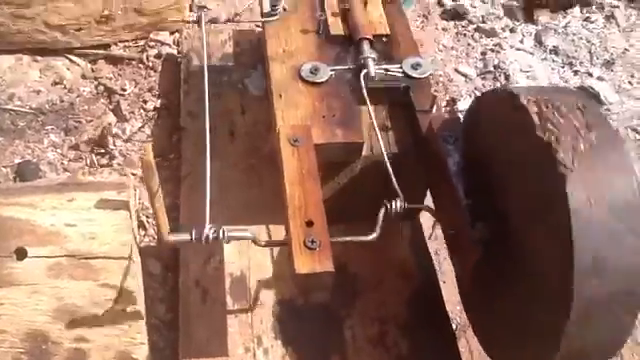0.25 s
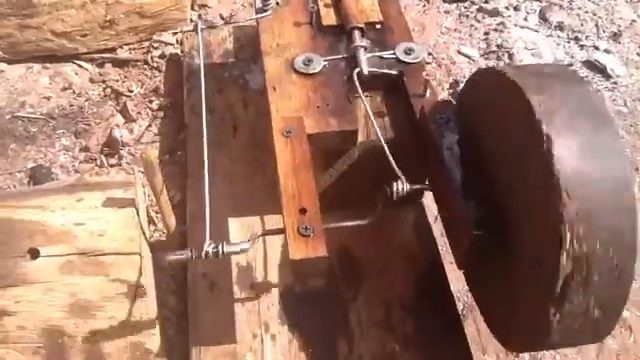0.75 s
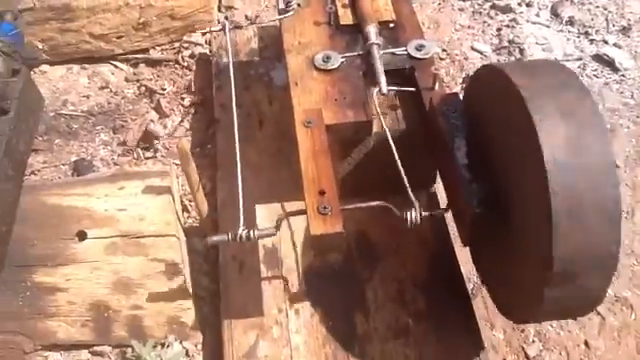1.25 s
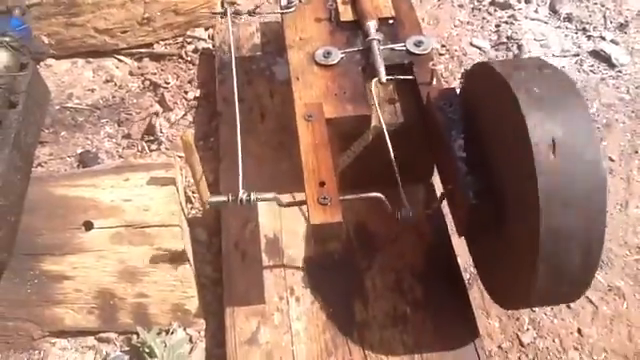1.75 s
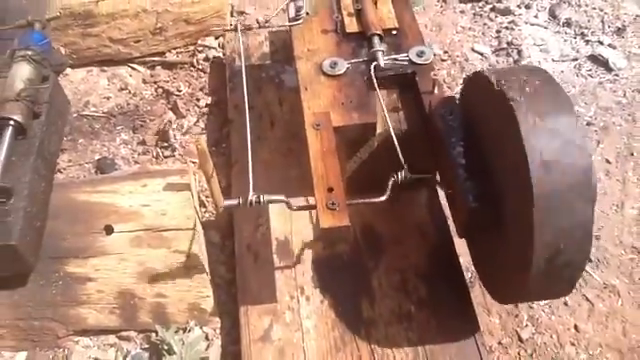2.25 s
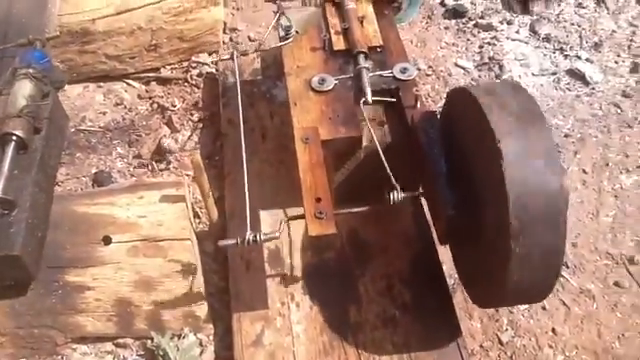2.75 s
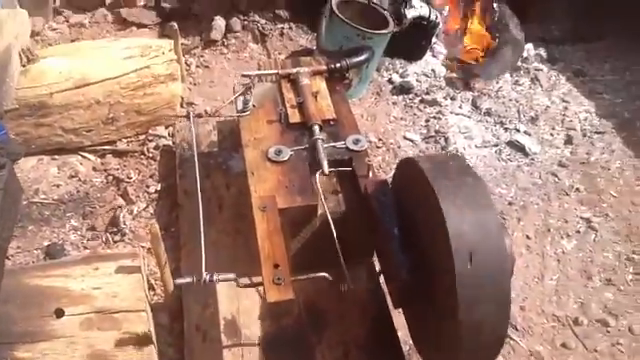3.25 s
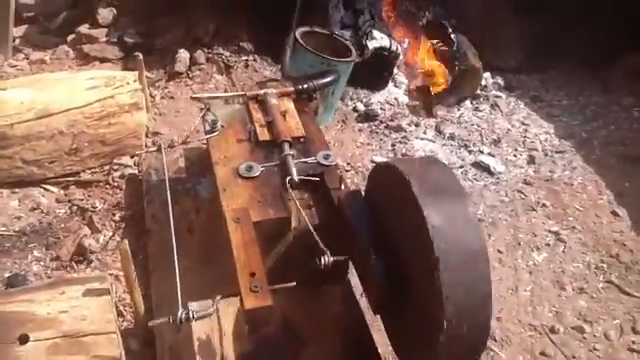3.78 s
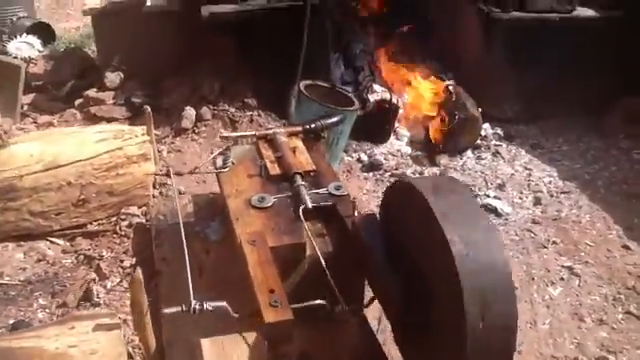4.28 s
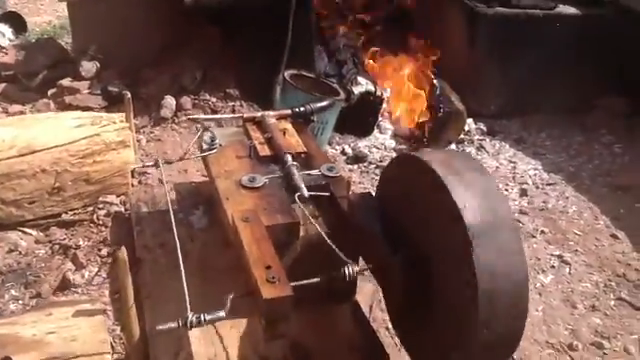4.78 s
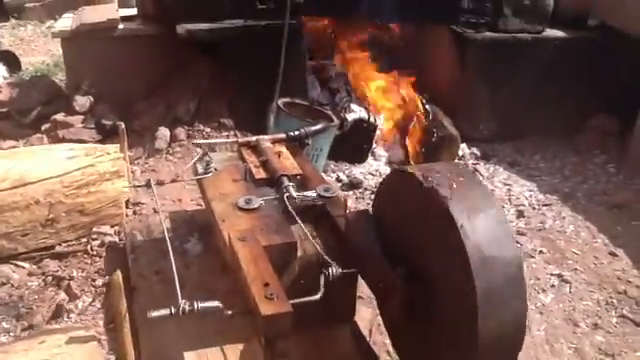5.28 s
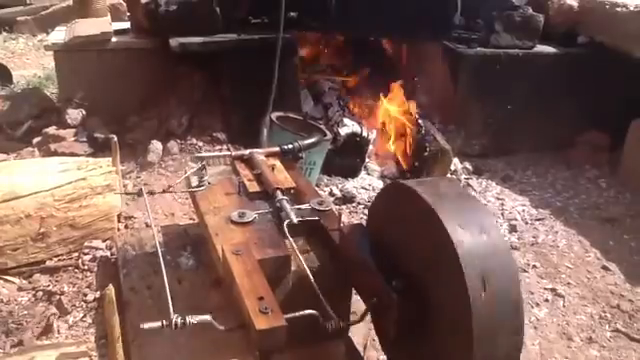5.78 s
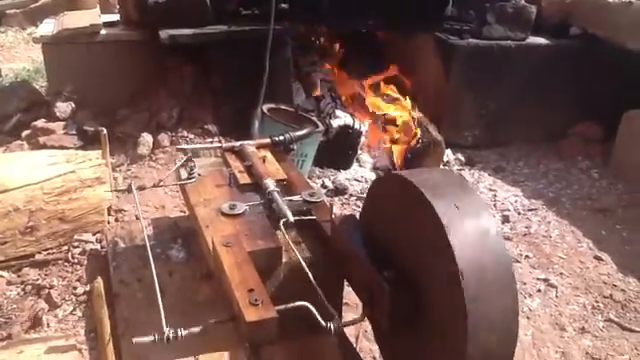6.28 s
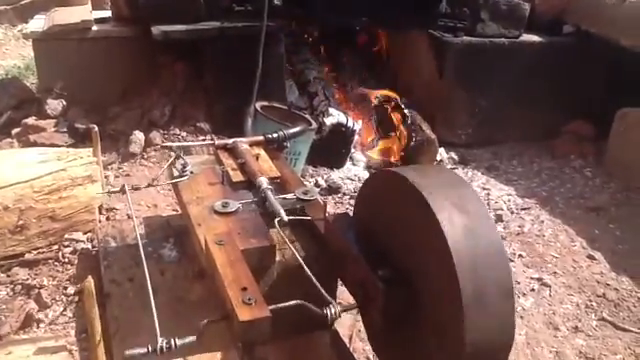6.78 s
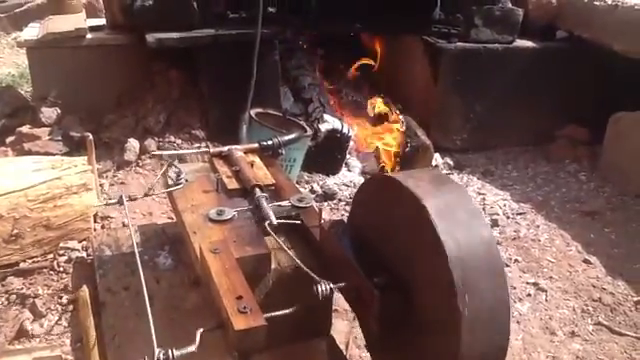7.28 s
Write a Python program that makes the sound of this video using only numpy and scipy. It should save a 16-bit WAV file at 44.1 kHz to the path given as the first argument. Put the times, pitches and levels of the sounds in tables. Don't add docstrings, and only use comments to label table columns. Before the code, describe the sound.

Loud, wet, airy steam pulses dominate from start to finish, rushing in and puffing out with each flywheel turn, faster and faster. Small wooden knocks and metallic clicks sit faintly beneath, alongside a lumpy low flame roar. Wood pops sparsely around the middle, loudest near five seconds, and a strong fire gulp comes near seven. Close microphone, dry open air, tone shifting subtly as the camera moves away.

```python
import sys
import numpy as np
from scipy import signal
from scipy.fft import rfft, irfft, next_fast_len
from scipy.io import wavfile
from scipy.ndimage import uniform_filter1d, map_coordinates

SR = 44100
rng = np.random.default_rng(int(sys.argv[2]) if len(sys.argv) > 2 else 0)


def int16_out(signal):
    q = np.round(np.clip(np.atleast_2d(signal).T, -1, 1) * 32767)
    wavfile.write(sys.argv[1], SR, q.astype(np.int16))


def convert_level_to_amplitude(level_db):
    exponent = np.asarray(level_db, float) / 20
    return 10 ** exponent


N = 332514
T = np.arange(N) / SR

# start in seconds, then blow-down, sweep and valve puff levels in dB.
FLYWHEEL_TURNS = [(-0.017, 2.5, 1.5, 0.5), (0.41, 0, 4.5, -1.5), (0.829, 1.2, 6, 0.5),
                  (1.237, 0.5, 4.5, -0.5), (1.64, 1.7, 3, -0.5), (2.034, 0.5, 4, 0.2),
                  (2.416, -2.5, 2.7, -1), (2.788, 0, 3.5, 0.7), (3.154, -0.6, 2.5, 0),
                  (3.504, 0.1, 1.5, -1.5), (3.846, 1.5, 2, 0.5), (4.178, -3.5, 2.5, 0.2),
                  (4.502, -1, 1.5, 0.2), (4.815, 0.7, 2, -0.5), (5.12, -0.5, 1, 0.3),
                  (5.417, -2, 0.5, -4.5), (5.705, -4, 1.5, 0.4), (5.991, -0.2, 2, 0.4),
                  (6.266, -3, -2, 0.5), (6.536, -2, 0, -1), (6.797, -2.5, -0.5, -1.5),
                  (7.055, -2.5, 0.5, -0.5), (7.304, -0.5, 1.8, -5), (7.547, -2, -6, -6)]
# frequency in Hz, level in dB.
NOZZLE_COLOUR = [(800, -35), (2000, -2.5), (3500, -0.5), (6000, 2), (8000, 4), (11000, 0.5), (13500, 1),
                 (15500, 0)]
# crank angle 0-1, lower edge of the jet in Hz,
# hump of the jet in Hz.
VALVE_PORT = [(0, 6500, 8300), (.06, 5540, 7600), (.13, 4140, 6550), (.195, 3780, 6880), (.235, 5400, 7000),
              (.75, 5340, 7300), (.82, 4100, 6600), (.89, 4400, 4900), (1, 6500, 8300)]
# time in seconds, turned away 0-1, notch in Hz, level in dB,
# gravel echo in ms.
CAMERA_SWING = [(0, 0, 8800, -0.9, 1.76), (.7, 0, 8800, 0.3, 1.92), (2.3, 0.05, 9100, -0.55, 1.64),
                (3.3, 0.08, 9370, 0.6, 1.72), (3.9, 0.4, 10700, -0.3, 1.65), (4.35, 0.6, 11600, 1.3, 1.53),
                (4.7, 0.3, 13300, 0.2, 1.54), (5.1, 0.8, 10800, 2.1, 1.51), (5.6, 0.88, 11200, 0, 1.54),
                (6.5, .9, 11200, 1, 1.45), (7.54, .95, 11000, 0.46, 1.58)]


def unit(x):
    return x / np.sqrt(np.mean(x ** 2) + 1e-20)


def between(ends, share):
    return ends[0] + share * (ends[1] - ends[0])


def bump(x, at, width):
    return np.exp(-((x - at) / width) ** 2 / 2)


def along(points, hz):
    f, db = np.transpose(points)
    return convert_level_to_amplitude(np.interp(np.log(hz + 1), np.log(f + 1), db))


def columns(rows, at):
    key, *cols = np.transpose(rows)
    return [np.interp(at, key, c) for c in cols]


def wobble(rate):
    return map_coordinates(rng.standard_normal(int(N * rate / SR) + 4), [T * rate])


def shaped(x, gain, size=256):
    hz, s, z = signal.stft(x, SR, nperseg=size, noverlap=size * 3 // 4)
    return signal.istft(z * gain(hz[:, None], s), SR, nperseg=size, noverlap=size * 3 // 4)[1][:N]


def filtered(x, response):
    m = next_fast_len(N + SR // 2)
    return irfft(rfft(x, m) * response(np.fft.rfftfreq(m, 1 / SR)), m)[:N]


def peak(hz, centre_hz, width_hz):
    return 1 / np.sqrt(1 + (2 * (hz - centre_hz) / width_hz) ** 2)


def crank(s):
    rows = np.array(FLYWHEEL_TURNS)
    turns = np.interp(s, rows[:, 0], np.arange(len(rows)))
    return turns % 1, rows[turns.astype(int)].T


def each_turn(angle):
    starts = np.array(FLYWHEEL_TURNS)[:, 0]
    return np.clip((starts[:-1] + angle * np.diff(starts)) * SR, 0, N - 1).astype(int)


def wet_steam(patchy_db, spit_db):
    def patches(hz, s):
        field = rng.standard_normal((len(hz), len(s)))
        field = uniform_filter1d(uniform_filter1d(field, size=4, axis=0), size=14, axis=1)
        return convert_level_to_amplitude(patchy_db * unit(field))
    flutter = convert_level_to_amplitude(spit_db * (wobble(60) + wobble(500)))
    return unit(shaped(rng.standard_normal(N), patches) * flutter)


def admission():
    def pressure(angle):
        return np.cos(2 * np.pi * (angle - 0.95))

    def build(angle):
        around = (angle + .5) % 1 - .5
        cutoff_angle = .2
        swell = (around < cutoff_angle) * bump(around, cutoff_angle, 0.053)
        return swell - 0.39 * bump(around, 0, 0.04)

    def port(hz, s):
        angle = crank(s)[0]
        edge_hz, hump_hz = columns(VALVE_PORT, angle)
        hump_db = -1 + 4 * pressure(angle) + 4.5 * build(angle)
        treble_db = -1.6 + 3 * pressure(angle)
        skirt = convert_level_to_amplitude(-18.5) + 1 / np.sqrt(1 + (edge_hz / (hz + 1)) ** 8)
        hump = hump_db * np.exp(-np.log((hz + 1) / hump_hz) ** 2 / 0.032)
        treble = treble_db / (1 + (10500 / (hz + 1)) ** 12)
        return along(NOZZLE_COLOUR, hz) * skirt * convert_level_to_amplitude(hump + treble)

    angle = crank(T)[0]
    boiler_db = 1.82 - 0.3734 * T
    level_db = -15 + 1.07 * pressure(angle) + 2.5 * build(angle) + boiler_db
    return convert_level_to_amplitude(level_db) * unit(shaped(wet_steam(1.0, 0.48), port))


def exhaust():
    # crank angle 0-1, level in dB.
    flow = [(.235, -21), (.27, -19), (.3, -13), (.34, -14.5), (.36, -18), (.47, -21.5), (.58, -20.5),
            (.69, -12), (.765, -19.5)]
    # rest in Hz, angle 0-1 where the climb starts,
    # climb in Hz per turn, level early in dB, level late in dB.
    glides = [(3445, 0.43, 10100, -8, 4.5), (5750, .47, 12600, -2, 1.5), (7300, 0.35, 14500, 2.5, -4.5)]
    # width in Hz, level in dB.
    bore_modes = [(420, 0), (520, 1), (850, 1), (1100, -3), (1300, -2), (1500, -10)]
    soft_turns = 0.035
    opens, shuts = flow[0][0], flow[-1][0]

    def cylinder(hz, s):
        angle = np.clip(crank(s)[0], opens, shuts)
        stroke = (angle - opens) / (shuts - opens)
        centres = [rest + climb * soft_turns * np.logaddexp(0, (angle - at) / soft_turns)
                   for rest, at, climb, *_ in glides]
        step_hz = between((2450, 3420), stroke)
        centres += [centres[-1] + k * step_hz for k in (1, 2, 3)]
        upper_db = between((2.5, -4.5), stroke) + 0.9 * np.clip(columns(flow, angle)[0] + 15, -8, 0)
        strengths = [between(row[3:], stroke) for row in glides] + 3 * [upper_db]

        def unsteady():
            return np.interp(s, T, wobble(14))
        centres = [c * (1 + 0.02 * unsteady()) for c in centres]
        strengths = [more + 1.54 * unsteady() for more in strengths]
        power = sum((convert_level_to_amplitude(db + more) * peak(hz, c, w) ** 1.27) ** 2
                    for c, more, (w, db) in zip(centres, strengths, bore_modes))
        gain = np.sqrt(power + convert_level_to_amplitude(-38.5) * along(NOZZLE_COLOUR, hz))
        return gain / np.sqrt(np.mean(gain ** 2, axis=0))

    angle, turn = crank(T)
    late = np.clip((angle - .35) / 0.42, 0, 1)
    turn_db = between(turn[1:3], late)
    open_port = (angle > opens) & (angle < shuts)
    level = open_port * convert_level_to_amplitude(columns(flow, angle)[0] + turn_db)
    return level * unit(shaped(wet_steam(1.0, 0.61), cylinder))


def puffs():
    # crank angle 0-1, level in dB, width in turns.
    valve_edges = [
        (.785, -10, 0.014),
        (0.84, -15, 0.02),
        (.222, -13, 0.007),
    ]
    # frequency in Hz, level in dB.
    puff_colour = [(500, -41), (1500, -12), (3000, -10.5), (5000, -5), (7500, 4.5), (9300, -0.5),
                   (11000, 0), (15500, -8)]
    angle, turn = crank(T)
    gate = sum(convert_level_to_amplitude(db) * bump(angle, at, width) for at, db, width in valve_edges)
    burst = unit(filtered(wet_steam(3.2, 0.51), lambda hz: along(puff_colour, hz)))
    return gate * convert_level_to_amplitude(2.2 * turn[3]) * burst


def rush():
    # frequency in Hz, level in dB.
    pipe_colour = [(500, -36), (1000, -17), (1600, -2.5), (2300, 0), (2850, -1.5), (3350, 1), (4300, -7),
                   (7000, -13.5)]
    angle = crank(T)[0]
    depth = between((1.15, 0.76), T / T[-1])
    opening_khz = (6500 - columns(VALVE_PORT, angle)[0]) / 1000
    surge_db = 6 * bump(angle, 0.566, 0.13)
    level_db = -38 + 9 * (1 - depth) + depth * 3 * opening_khz + surge_db
    return convert_level_to_amplitude(level_db) * unit(filtered(wet_steam(1.4, 0.52), lambda hz: along(pipe_colour, hz)))


def frame():
    # frequency in Hz, width in Hz, level in dB.
    wood_modes = [(536, 36, 0), (708, 71, -0.5), (1160, 133, 3.5), (1700, 380, -10.5)]
    # crank angle 0-1, peak level in dB, ring in Hz.
    knocks = [
        (.045, -35, 543),
        (.215, -42, 1490),
        (0.301, -34, 1700),
        (.66, -32, 990),
        (.7, -33.5, 1700),
        (0.779, -33.5, 1195),
        (.93, -34, 1160),
    ]

    def wood(f):
        return sum((-1) ** k * convert_level_to_amplitude(db) * 1j * f * w / (c * c - f * f + 1j * f * w)
                   for k, (c, w, db) in enumerate(wood_modes))

    load_db = 6 * bump(crank(T)[0], 0.902, 0.16)
    rub_db = -44.5 + load_db + 1.9 * wobble(25)
    out = convert_level_to_amplitude(rub_db) * unit(filtered(rng.standard_normal(N), wood))
    t = T[:2000]
    for angle, db, hz in knocks:
        at = each_turn(angle)
        blows = np.zeros(N)
        blows[at] = convert_level_to_amplitude(db + 3.8 * np.tanh(rng.standard_normal(len(at)))) * (at > 0)
        ring = np.sin(2 * np.pi * hz * t) * convert_level_to_amplitude(-60 * t / 0.059)
        out = out + signal.fftconvolve(blows, ring)[:N]
    return out


def fire():
    # frequency in Hz, level in dB per Hz.
    roar_colour = [(20, -58), (54, -24.5), (168, 3), (306, -7), (395, -14), (560, -13), (900, -14),
                   (1300, -60)]
    # time in seconds, change in dB, half length in seconds.
    draughts = [(.67, 3.5, 0.078), (2.334, 2.5, 0.029), (2.536, -3, 0.038), (4.703, 4, 0.1),
                (4.96, 3, 0.031), (5.203, 4.5, 0.23), (5.652, -3.5, .1), (6.148, 3, 0.022),
                (6.55, -2.5, 0.19), (6.94, 2.5, 0.065), (7.202, -2.5, 0.082)]
    # time in seconds, peak level in dB, frequency in Hz.
    gulps = [
        (2.647, -33, 159),
        (4.721, -37, 159),
        (5.223, -37, 215),
        (6.907, -21, 187),
        (6.93, -21, 213),
        (7.346, -35, 134.6),
    ]
    # time in seconds, peak level in dB, ring in Hz, crack level in dB.
    pops = [
        (3.449, -25, 2340, -1),
        (3.844, -22, 553, 5),
        (4.129, -30, 2360, 0),
        (4.954, -13.5, 1820, -1),
    ]
    draught_db = sum(db * bump(T, s, half) for s, db, half in draughts) + 0.8 * wobble(6)
    lumps = convert_level_to_amplitude(1.15 * wobble(22))
    flames = filtered(rng.standard_normal(N), lambda hz: along(roar_colour, hz))
    out = convert_level_to_amplitude(-40.5 + draught_db) * unit(lumps * flames)
    t = T[:2000]
    for s, db, hz in gulps:
        gulp = np.exp(-((t - .004) / 0.0023) ** 2) * np.cos(2 * np.pi * hz * (t - .004))
        out[round(s * SR):][:len(t)] += convert_level_to_amplitude(db + 0.5) * gulp
    for s, db, hz, crack_db in pops:
        ring = np.sin(2 * np.pi * hz * t) + 0.19 * np.cos(2 * np.pi * 1150 * t)
        crack = convert_level_to_amplitude(crack_db) * (np.sin(2 * np.pi * 4200 * t) + 1.1 * np.sin(2 * np.pi * 5800 * t))
        decay = convert_level_to_amplitude(-60 * t / .0045)
        snap = convert_level_to_amplitude(db + 2.0) * decay * (ring + crack)
        snap = snap - uniform_filter1d(snap, size=90)
        out[round((s + .0021) * SR):][:len(t)] += snap
        out[round((s + .0038) * SR):][:len(t)] += 1.25 * snap
    return out


def ground(x):
    def path(hz, s):
        away, notch_hz, level_db, gravel_ms = columns(CAMERA_SWING, s)
        notch_db = between((-6.5, -2), away)
        low_db = between((0.14, -5), away)
        high_db = between((0.7, 3.5), away)
        log_share = between((0.16, 0.021), away)
        gravel_echo = 0.27 * np.exp(-2j * np.pi * hz * gravel_ms / 1000)
        log_echo = log_share * np.exp(-2j * np.pi * hz * 0.86 / 1000)
        rough = 1 / (1 + (hz / 6000) ** 4)
        shade_db = notch_db * peak(hz, notch_hz, 1580) ** 2 + low_db / (1 + (hz / 4300) ** 6)
        shade_db = shade_db + high_db / (1 + (notch_hz / (hz + 1)) ** 8)
        return convert_level_to_amplitude(level_db + shade_db) * np.abs(1 + rough * (gravel_echo + log_echo))
    return shaped(x, path, size=512)


def scatter(x):
    def paths(hz, s):
        field = rng.standard_normal((2, len(hz), len(s)))
        real, imag = unit(uniform_filter1d(uniform_filter1d(field, size=3, axis=1), size=28, axis=2))
        share = 0.29 * np.clip(hz / 9000, .25, 1.25)
        return np.abs(1 + share * (real + 1j * imag)) / np.sqrt(1 + 2 * share ** 2)
    return shaped(x, paths, size=1024)


def scene():
    steam = scatter(ground(admission() + exhaust() + puffs() + rush()))
    rattle = convert_level_to_amplitude(-2.2 * columns(CAMERA_SWING, T)[0]) * frame()
    mono = steam + rattle + fire()
    return np.array([mono, mono])


def low_pass(x):
    return signal.sosfilt(signal.butter(12, 16600, fs=SR, output="sos"), x)


def record(dry):
    top_hz, bass_hz = 15310, 70
    clipped = dry[0] / (1 + np.abs(dry[0] / .96) ** 8) ** (1 / 8)
    kept = filtered(clipped, lambda hz: (hz < top_hz) * (1j * hz / (bass_hz + 1j * hz)) ** 3)
    return low_pass(np.array([kept, kept]))


dry = scene()
out = record(dry)
int16_out(out)
```